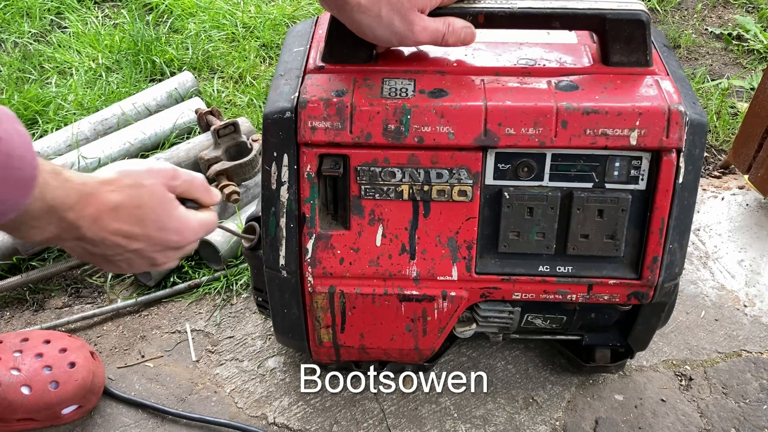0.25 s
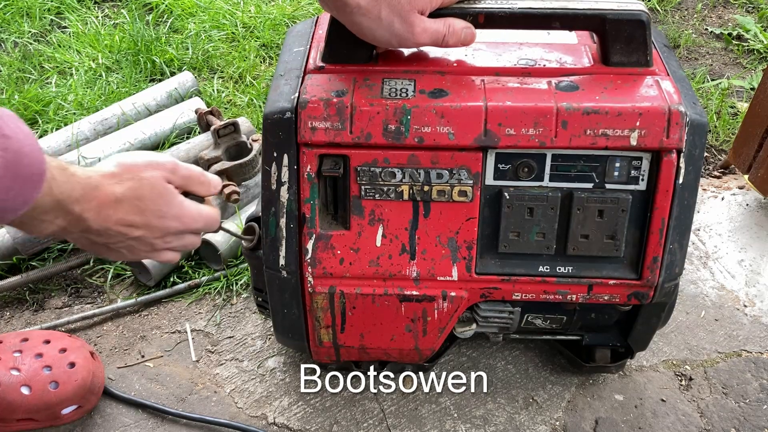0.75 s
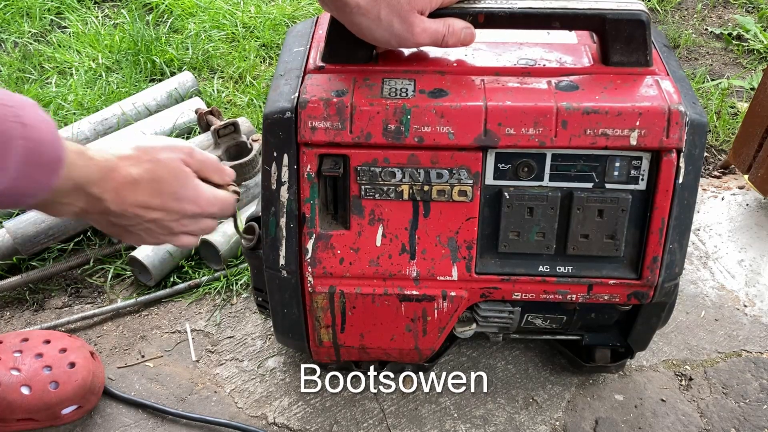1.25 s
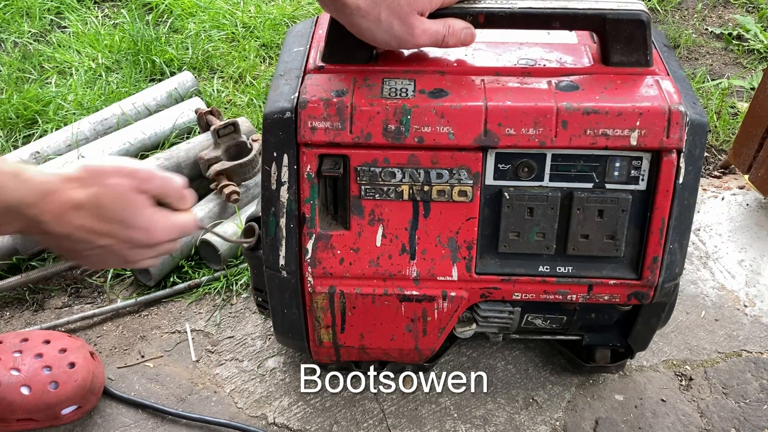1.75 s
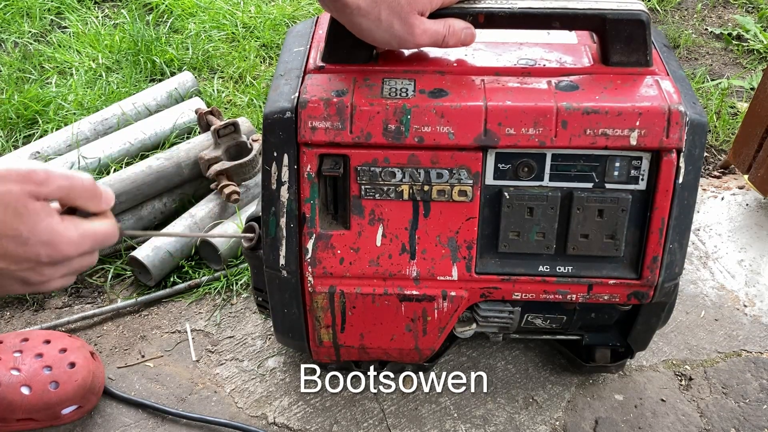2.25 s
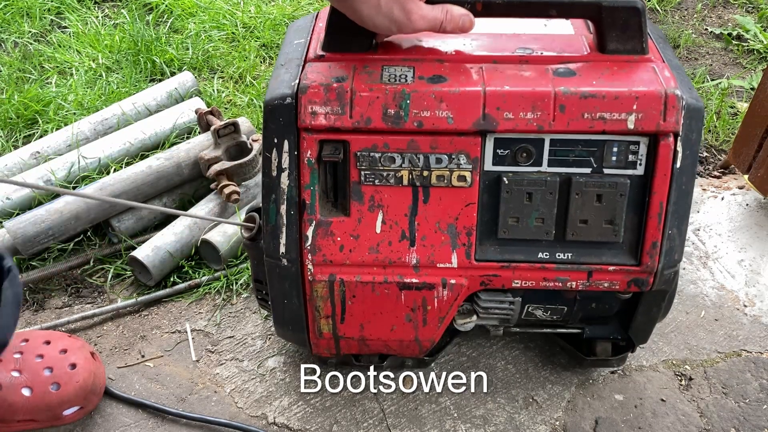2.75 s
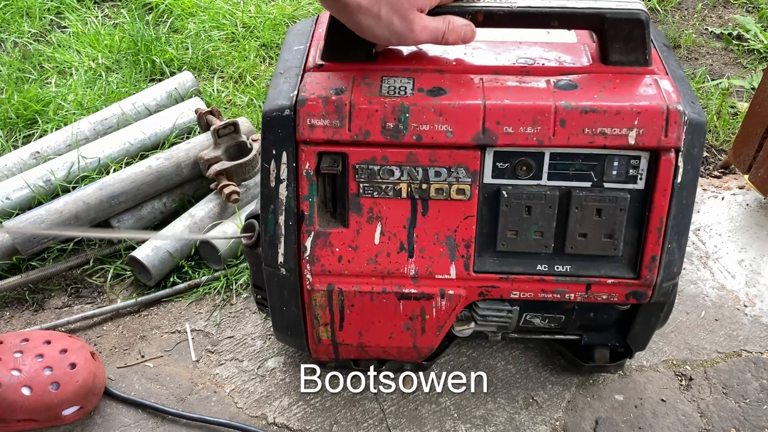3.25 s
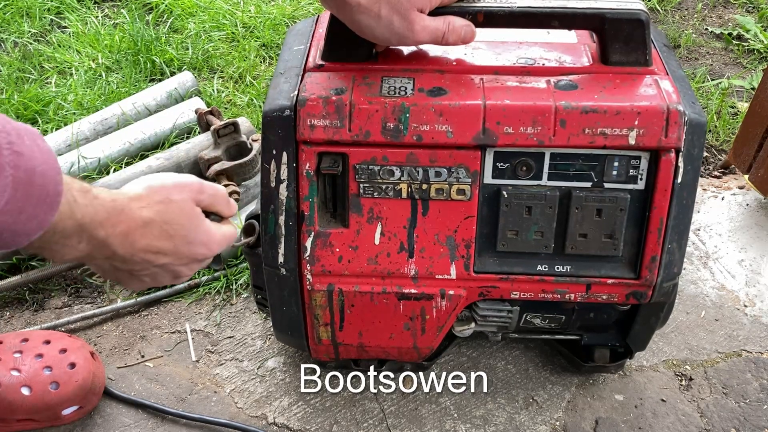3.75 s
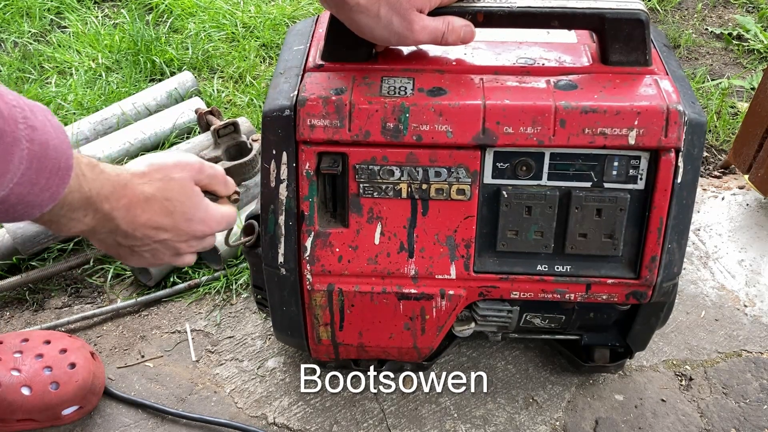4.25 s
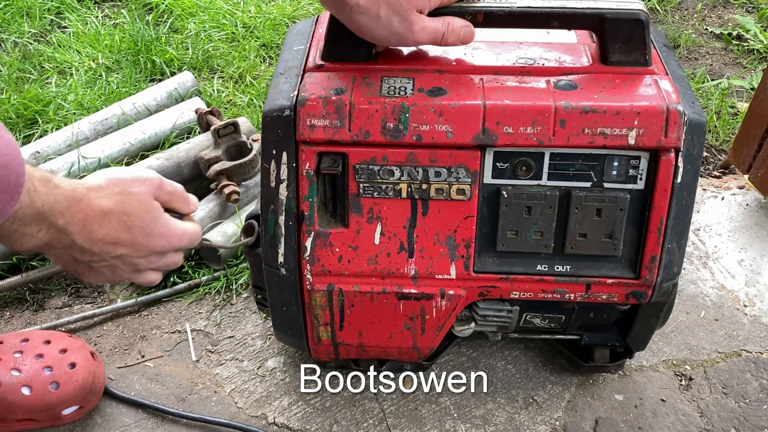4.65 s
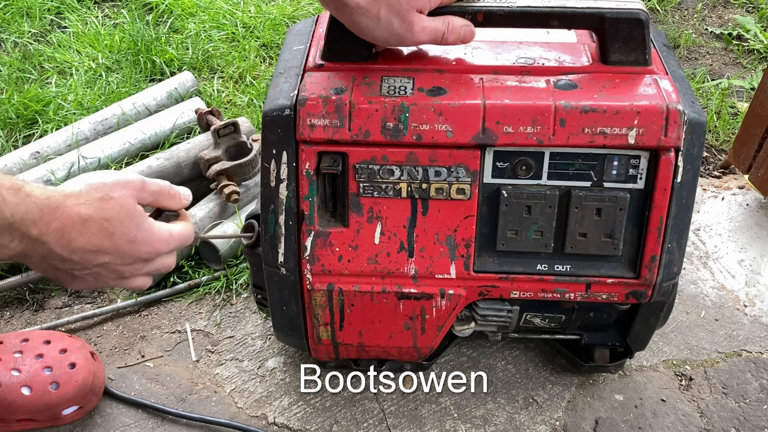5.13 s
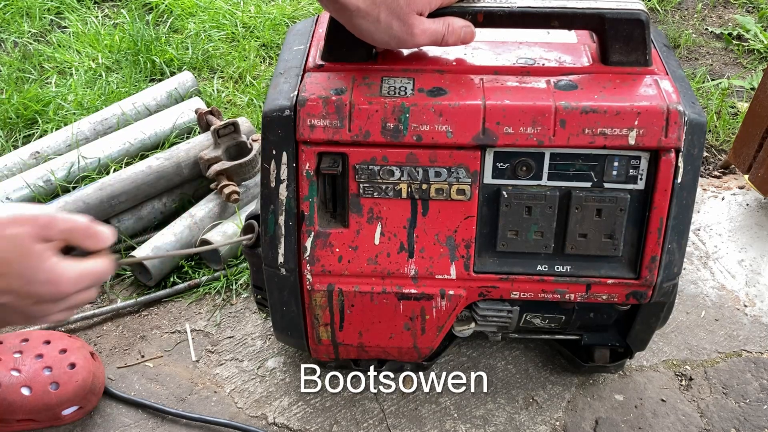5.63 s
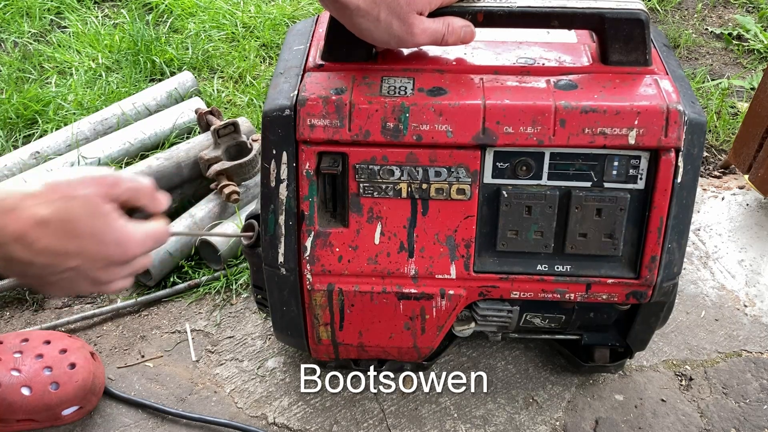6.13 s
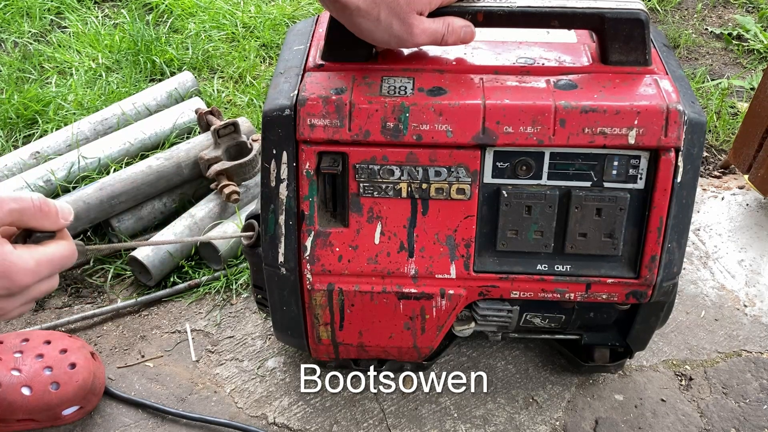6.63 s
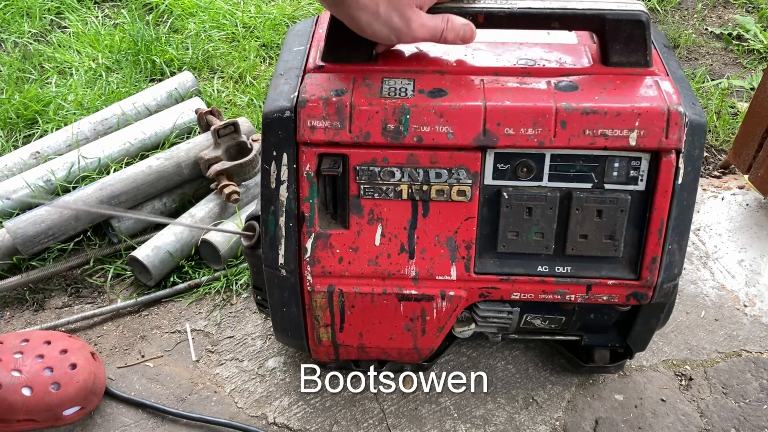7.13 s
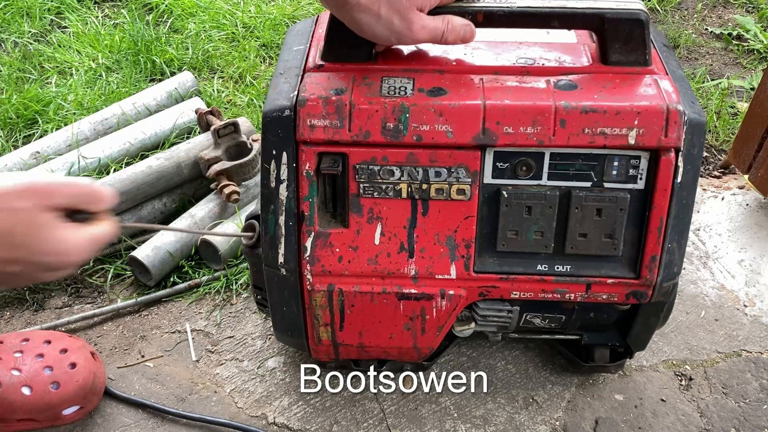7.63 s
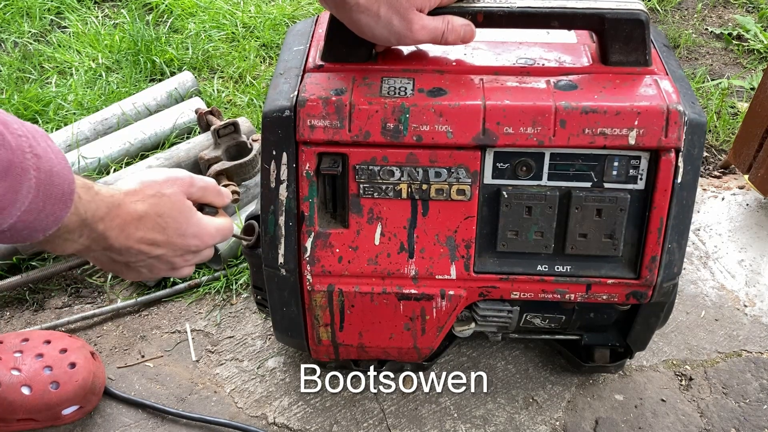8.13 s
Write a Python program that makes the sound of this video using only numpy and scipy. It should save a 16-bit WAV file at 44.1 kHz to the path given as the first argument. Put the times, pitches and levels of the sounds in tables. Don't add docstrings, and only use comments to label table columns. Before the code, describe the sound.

Two hard cord pulls spin a cold engine that ticks, whirrs and coasts down, the second bringing two weak exhaust coughs outdoors.

```python
import sys
import numpy as np
from scipy import signal
from scipy.fft import rfft, irfft, next_fast_len
from scipy.io import wavfile
from scipy.ndimage import uniform_filter1d, map_coordinates

SR = 44100
rng = np.random.default_rng(int(sys.argv[2]) if len(sys.argv) > 2 else 0)


def digitize_waveform(pressure):
    field = np.atleast_2d(pressure).T
    bounded = np.clip(field, -1, 1)
    quanta = np.round(bounded * 32767).astype(np.int16)
    wavfile.write(sys.argv[1], SR, quanta)


def magnitude_from_level(level_db):
    exponent = np.asarray(level_db, float) / 20
    return 10 ** exponent


N = 369558

# t/s, level/dB
CRANK = [(0.0, -41.5), (0.8, -50), (1.7, -56.5), (1.96, -63), (2.56, -59.5), (2.66, -34.5), (2.85, -29.5),
         (2.9, -39), (3.2, -39), (3.65, -44), (4.73, -54.5), (5.2, -62.5), (6.77, -67.5), (6.89, -37),
         (7.11, -29.5), (7.19, -43), (7.42, -39.5), (8.38, -51)]
# f/Hz, width/Hz, level/dB
CASE = [(264.5, 20, -2), (638, 13, 4.5), (865, 14, -1), (976, 97, -5), (1186, 27, -1.5), (1444, 39, -4.5),
        (1749, 97, -5), (2060, 49, -11)]
# f/Hz, density/(dB per Hz)
SIZZLE = [(3240, -35), (5500, -3.5), (6200, -13), (6650, -6.5), (7640, -9), (9160, -9.5), (10700, -5.5),
          (11300, -8.5), (13200, -14.5), (13600, -20.5), (15500, -9.5), (16300, -35.5), (16700, -49)]
# t/s, crack peak/dB
VALVES = [(0.117, -24), (0.321, -25), (0.5606, -25.5), (0.858, -27), (1.284, -36), (2.959, -21),
          (3.1932, -22), (3.342, -22.5), (3.5114, -24.5), (3.698, -24), (3.915, -25), (4.1779, -26.5),
          (4.5143, -28.5), (7.219, -14.5), (7.3758, -23.5), (7.531, -22), (7.6977, -18.5), (7.8916, -24.5),
          (8.1111, -22.5)]
# t/s, crack peak/dB
SECONDS = [(0.162, -31.5), (0.3732, -28.5), (0.624, -29.5), (0.943, -31.5), (1.3758, -39.5), (3.057, -20),
           (3.973, -34.5), (4.248, -29), (4.583, -38.5), (4.615, -29), (7.335, -26), (7.7438, -42),
           (7.9409, -29), (8.1713, -27)]
# t/s, crack peak/dB, knock over it/dB, sizzle over it/dB
BITES = [(1.4376, -30, -5.5, -4), (1.7417, -32.5, 9.5, -11), (2.0698, -27.5, -15, -0.5),
         (2.0895, -19, 3, -17), (2.111, -27, 12, 9), (5.2865, -29.5, -13, -4), (5.3, -21.5, -2.5, -3),
         (5.577, -30, -15, -11), (5.6765, -26.5, -1, -15.5), (6.1734, -30.5, -7.5, -4),
         (6.1907, -22.5, -5.5, 1), (6.362, -29, -25, -11.5), (6.4175, -27, 1.5, -2.5)]


def unit(x):
    return x / np.sqrt(np.mean(x ** 2) + 1e-20)


def along(points, hz):
    f, v = np.transpose(points)
    return np.interp(np.log(hz + 1), np.log(f + 1), v)


def curves(rows):
    s, *cols = np.transpose(rows)
    return [np.interp(np.arange(N) / SR, s, c) for c in cols]


def wobble(rate):
    knots = rng.standard_normal(int(N * rate / SR) + 4)
    return map_coordinates(knots, [np.arange(N) * rate / SR])


def gritty(depth_db):
    return magnitude_from_level(depth_db * wobble(150)) * rng.standard_normal(N)


def filtered(x, response):
    m = next_fast_len(N + SR // 2)
    gain = response(np.fft.rfftfreq(m, 1 / SR))
    gain = gain / np.sqrt(np.mean(np.abs(gain) ** 2))
    return irfft(rfft(x, m) * gain, m)[..., :N]


def colour(spectrum):
    return lambda hz: magnitude_from_level(along(spectrum, hz))


def resonances(modes, widen=1):
    def response(f):
        return sum(magnitude_from_level(db) * 1j * f * w * widen / (c * c - f * f + 1j * f * w * widen)
                   for c, w, db in modes)
    return response


def swells(times, dbs, rise, fall, slow=1):
    t = np.arange(0, N + 64, 64) / SR
    late = (t - np.asarray(times)[:, None]) / np.reshape(slow, (-1, 1))
    drop_db = np.where(late > 0, fall * late, -rise * late)
    gain = magnitude_from_level(np.asarray(dbs)[:, None] - drop_db).sum(axis=0)
    return np.interp(np.arange(N) / SR, t, gain)


def bursts(times, dbs, rise, t60):
    t = np.arange(SR // 4) / SR
    train = np.bincount(np.round(times * SR).astype(int), magnitude_from_level(dbs), N)[:N]
    envelope = (1 - np.exp(-(t / rise) ** 2)) * magnitude_from_level(-60 * t / t60)
    return signal.fftconvolve(train, envelope)[:N] * rng.standard_normal(N)


def rings(events, modes, scatter_db, flutter_db, length=.4):
    out, t = np.zeros(N + 2 * SR), np.arange(round(length * SR)) / SR

    def flutter():
        return flutter_db * np.interp(t, np.linspace(0, 2, 110), rng.standard_normal(110))

    for s, db in events:
        ring = 0
        for hz, level, t60 in modes:
            level_db = level + scatter_db * rng.normal() + flutter() - 60 * t / t60
            turns = hz * t + 0.025 * flutter() + rng.random()
            ring = ring + magnitude_from_level(level_db) * np.sin(2 * np.pi * turns)
        out[round(s * SR):][:len(t)] += magnitude_from_level(db) * ring * (1 - np.exp(-t / .004))
    return out[:N]


def echoes(x, decay):
    hz, t, z = signal.stft(rng.standard_normal((2, SR)), SR, nperseg=256)
    tail = signal.istft(z * magnitude_from_level(-60 * t / along(decay, hz)[:, None]), SR, nperseg=256)[1]
    return signal.fftconvolve(x[None], tail / np.linalg.norm(tail[0]), axes=1)[:, :N]


def far_engine():
    # t/s, f/Hz, level/dB
    drone = [(0, 59.9, -55), (.6, 58.04, -41), (1.2, 66, -50.5), (2.5, 59.86, -51), (3.9, 55, -50),
             (4.5, 63, -43), (4.8, 66, -45.5), (5.1, 62, -58), (8.38, 58.3, -60)]
    hz, db = curves(drone)
    turn = 2 * np.pi * np.cumsum(hz * (1 + 0.011 * wobble(6))) / SR
    return magnitude_from_level(db + 2 + 2.5 * wobble(7)) * (np.sin(turn) + magnitude_from_level(-8.5) * np.sin(2 * turn))


def town():
    # t/s, level/dB
    traffic = [(0.0, -41.5), (1.75, -43.5), (1.98, -44.5), (4.43, -44), (4.57, -44), (5.09, -47),
               (6.3, -50), (8.38, -45.5)]
    # f/Hz, density/(dB per Hz)
    rumble_bands = [(20, -51.5), (34, -4.5), (59, 2.5), (81, -4.5), (113, -9), (135, -12.5), (166, -31),
                    (200, -25.5), (260, -31), (440, -120)]
    # f/Hz, density/(dB per Hz)
    air_bands = [(76, -15.5), (130, -3), (167, -9.5), (390, -13.5), (656, -21), (964, -21.5), (1240, -42),
                 (1360, -26), (2680, -43.5), (2950, -33), (13000, -83.5)]

    def pair(spread):
        return np.array([[1, spread], [1, -spread]]) @ rng.standard_normal((2, N))

    rumble_db = curves(traffic)[0] + 4.0 + 1.27 * wobble(12.0) + [[-.7], [.7]]
    rumble = unit(filtered(pair(.12), colour(rumble_bands))) * magnitude_from_level(rumble_db)
    air = unit(filtered(pair(0.37), colour(air_bands))) * magnitude_from_level(-53 + 0.58 * wobble(2.8))
    return rumble + far_engine() + air


def rattle(count):
    when, pitch, size, slide = rng.random((count, 4)).T[..., None]
    t = np.arange(900) / SR
    panel = 1 + (pitch * (len(CASE) - 1)).astype(int)
    hz = np.transpose(CASE)[0][panel] * (1 + .1 * (slide - .5))
    envelope = magnitude_from_level(8.5 * size ** 2 - 60 * t * hz / 40) * (1 - np.exp(-t / 0.0015))
    ping = envelope * np.sin(2 * np.pi * hz * t * (1 + 8 * (slide - .5) * t))
    at = (when * N + t * SR).astype(int)
    return unit(np.bincount(at.ravel(), ping.ravel())[:N])


def whirr():
    # f/Hz, density/(dB per Hz)
    broad_bands = [(88, -38.5), (150, -4.5), (427, -9), (630, -1.5), (746, -16.5), (1030, 2.5), (1300, -10),
                   (1830, -8.5), (8500, -35), (11000, -59), (18700, -120)]
    panels = unit(filtered(gritty(5.5), resonances(CASE)))
    broad = unit(filtered(gritty(1.0), colour(broad_bands)))
    valve_s = np.transpose(VALVES)[0]
    bite_s, bite_db = np.transpose(BITES)[:2]
    chuff_db, chuff_s = -4, 0.1
    chuff = 1 + swells(valve_s + 0.016, 0 * valve_s + chuff_db, 570, 20 / chuff_s)
    shake = swells(bite_s + 0.0031, bite_db - 26, rise=600, fall=155)
    turning = magnitude_from_level(curves(CRANK)[0]) * chuff + shake
    noise = magnitude_from_level(-3.5) * panels + magnitude_from_level(-5) * broad + magnitude_from_level(-5.0) * rattle(count=900)
    return turning * magnitude_from_level(2.42 * wobble(25)) * noise


def piston_air():
    # f/Hz, width/Hz, level/dB
    gaps = [(7850, 74, -1), (8750, 78, -3), (9800, 140, -2), (10920, 100, -1.5), (12260, 180, -23),
            (12750, 130, -16), (15000, 42, -26), (15700, 36, -10)]
    # peak t/s, level/dB, slowness
    strokes = [(0.0, -54, 0.62), (0.23, -58, 0.41), (0.44, -59, 0.5), (0.57, -64, 0.51), (0.7, -57, 0.54),
               (0.86, -59, 0.63), (1.05, -55, 0.65), (1.28, -59.5, 1), (1.63, -54, 1.8), (3.2, -57, 6.5),
               (3.81, -59, 0.84), (4.041, -61, 0.52), (4.18, -58, 0.39), (4.329, -59.5, 0.8),
               (4.51, -55, 1), (4.739, -56.5, 1), (5.06, -55, 1.46), (7.45, -53, 5.8), (7.97, -64, 1.3),
               (8.25, -62, 0.94), (8.38, -57, 0.41)]
    # peak t/s, level/dB
    jets = [
        (2.101, -54),
        (2.89, -32.5),
        (5.31, -47.5),
        (5.611, -65),
        (6.19, -54),
        (6.439, -69),
        (7.13, -28),
    ]

    def gap_response(hz):
        return resonances(gaps, widen=2.2)(hz) * np.clip(hz / 7600, 0, 1) ** 8

    hiss = unit(filtered(gritty(3.3), gap_response))
    leak = magnitude_from_level(-62 + 2.1 * (curves(CRANK)[0] + 39.0))
    s, db, slow = np.transpose(strokes)
    puffs = swells(s, db, rise=246, fall=291, slow=slow)
    blasts = swells(*np.transpose(jets), rise=793, fall=224)
    return (leak + puffs + blasts) * magnitude_from_level(2.5) * hiss


def cord_rasp():
    # peak t/s, level/dB, slowness
    cord = [
        (2.619, -56, 1.2),
        (2.75, -38, 1.3),
        (6.44, -61.5, 2.2),
        (6.6, -61, 2),
        (6.74, -59, 1.3),
        (6.88, -55, 1.3),
        (6.99, -40, 0.98),
        (2.09, -52, 0.53),
    ]
    s, db, slow = np.transpose(cord)
    gain = swells(s, db, rise=255, fall=278.5, slow=slow)
    return gain * unit(filtered(gritty(2.5), colour(SIZZLE)))


def contacts():
    # t/s, knock/dB
    bumps = [(0.695, -39.5), (1.036, -40), (1.35, -41.5), (2.022, -38.5), (2.077, -26), (1.704, -35),
             (2.013, -36.5), (2.0436, -38), (4.323, -38.5), (4.4646, -44.5), (6.0955, -32), (6.246, -35.5),
             (6.2977, -34), (7.9924, -37), (8.2346, -36.5), (8.3442, -39)]
    # t/s, knock/dB
    ratchet = [(2.617, -40), (2.7, -32), (2.716, -27), (2.737, -26.5), (2.785, -26), (2.842, -31),
               (2.858, -28), (6.915, -34), (6.94, -29), (6.986, -21), (6.997, -21), (7.014, -23),
               (7.04, -27), (7.079, -27), (7.102, -27), (5.371, -38), (5.412, -43), (5.449, -44)]
    # t/s, crack peak/dB, knock over it/dB, sizzle over it/dB
    pulls = [(2.642, -36, 2.5, -5), (2.671, -22.5, 6, -25), (2.7217, -23.5, -9, -8.5),
             (2.753, -18.5, -1, -9), (2.816, -10, -5, -8), (2.8683, -8.5, -10, -0.5),
             (2.8943, -36, -12, 17.5), (6.871, -36.5, 3, -12), (6.8912, -27.5, 1, -7),
             (6.962, -25, -5, 0.5), (6.985, -20, -5.5, -13), (7.052, -11, -6, -6), (7.112, -12, -2, 4)]
    # crack, knock and sizzle in dB over the row's level
    kinds = ((VALVES, (0, -11.5, -13)), (SECONDS, (0, -27, -15)), (bumps + ratchet, (-23.5, 0, -46)))
    blows = [(s, *np.add(db, mix)) for rows, mix in kinds for s, db in rows]
    clacks = [(s, db, db + knock, db + sizzle) for s, db, knock, sizzle in BITES + pulls]
    return np.transpose(blows + clacks)


def tocks(times, dbs):
    mode_hz, spread, peak_s = 1045, .05, .0042
    out, t = np.zeros(N + SR), np.arange(SR // 20) / SR
    envelope = (t / peak_s * np.exp(1 - t / peak_s)) ** 2
    for s, db, chance in zip(times, dbs, rng.standard_normal((len(times), 1))):
        tone = np.sin(2 * np.pi * mode_hz * (1 + spread * chance) * t)
        out[round(s * SR):][:len(t)] += magnitude_from_level(db) * envelope * tone
    return out[:N]


def cover_knocks(s, knock_db):
    # f/Hz, width/Hz, level/dB
    cover = [(259.3, 11, -4.5), (642.4, 30, 3), (1004, 110, 4), (1110, 12, -29.5)]
    # f/Hz, level/dB, t60/s
    tappet = [(1780, 2.5, 0.067), (1420, 0, 0.11), (1030, -4, 0.044)]
    # t/s, level/dB
    thumps = [
        (2.641, -25),
        (2.652, -29),
        (5.304, -37),
        (5.69, -36),
        (6.097, -32),
        (6.298, -32),
        (6.871, -27.5),
        (7.112, -21),
    ]
    # f/Hz, level/dB, t60/s
    boom = [(642, 3.5, 0.059), (1090, -5.5, 0.073)]
    thuds = filtered(bursts(s - .0012, knock_db + 7, rise=0.0035, t60=0.028), resonances(cover))
    gear = rings(VALVES + SECONDS[:5], tappet, scatter_db=-0.5, flutter_db=0, length=.07)
    booms = rings(thumps, boom, scatter_db=-2, flutter_db=6.5, length=.1)
    return thuds + tocks(s, knock_db - 1) + magnitude_from_level(-12.5) * gear + booms


def starter_rings():
    # f/Hz, level/dB, t60/s
    cup = [(3176, -2.5, 1.15), (3095, -13, .7), (3767, -3.5, 1.5), (3829, -3, 1.6), (3822, -12, 1.2),
           (5650, -9, .2), (7375, -8, .22), (4764, -8, .08), (7655, -10, .28), (8012, -17, .24),
           (10965, -1, .16), (11020, -2, .2), (11130, -3, .18), (11465, -16, .25)]
    # t/s, level/dB
    release = [
        (2.872, -26.5),
        (7.112, -24),
    ]
    # f/Hz, level/dB, t60/s
    pawl = [(3150, -14, .3), (4800, 0, .3), (4900, -2, .25), (7400, 0, .1), (7100, -6, .1)]
    # t/s, level/dB
    catch = [
        (2.111, -34),
        (5.303, -38.5),
        (6.192, -47),
        (6.419, -34),
    ]
    cup_ring = rings(release, cup, scatter_db=.5, flutter_db=4.2, length=1.5)
    full = rings(catch[1:3], pawl, scatter_db=1.5, flutter_db=3)
    high = rings(catch[::3], pawl[3:], scatter_db=1, flutter_db=3)
    return cup_ring + full + high


def hits():
    # f/Hz, density/(dB per Hz)
    crack_bands = [(710, -13), (1200, -6.5), (2540, -8), (3050, -8), (3670, -6.5), (5450, -25), (6500, -30),
                   (8450, -26), (14300, -120)]
    s, db, knock_db, sizzle_db = contacts()

    def crack_response(hz):
        return colour(crack_bands)(hz) * (.8 + 1.5 * np.abs(resonances(CASE[4:7], widen=1.2)(hz)))

    crack = filtered(bursts(s - .002, db + 3, rise=.0055, t60=.04), crack_response)
    sizzle = filtered(bursts(s - .0015, sizzle_db + 3, rise=.0034, t60=.045), colour(SIZZLE))
    return crack + cover_knocks(s, knock_db) + sizzle + starter_rings()


def bird():
    # t/s, length/s, first f/Hz, last f/Hz, level/dB
    notes = [
        (4.906, .045, 8400, 8300, -74),
        (4.933, .07, 7850, 7850, -81),
        (4.948, 0.037, 8150, 8360, -63),
        (4.984, 0.078, 8500, 8700, -74),
        (4.99, .1, 7850, 7900, -85),
        (5.105, 0.09, 8300, 7970, -61),
        (5.348, 0.1, 4125, 3820, -40.5),
        (5.499, 0.1, 3487, 3300, -44),
        (5.598, 0.15, 2644, 2600, -54.5),
        (5.688, 0.092, 3290, 3090, -40),
             (5.95, 0.045, 8140, 8140, -60), (5.985, .03, 7900, 7940, -50),
                    (6, 0.04, 7430, 7540, -58), (6.023, 0.02, 8100, 8060, -56),
                    (6.037, 0.023, 7150, 7500, -52), (6.118, 0.16, 8130, 8460, -61),
                    (6.251, 0.13, 7800, 7570, -63), (6.268, 0.082, 9000, 8500, -65),
                    (6.35, 0.038, 8200, 7870, -58), (6.449, 0.062, 4670, 4150, -44.5),
                    (6.477, 0.053, 3970, 3730, -44.5), (6.503, 0.029, 4360, 4040, -51),
                    (6.544, 0.037, 3570, 2950, -45.5), (6.549, 0.037, 3840, 3280, -51),
                    (6.602, 0.018, 3240, 3330, -40), (6.645, 0.03, 4550, 4520, -42),
                    (6.672, .03, 4440, 4485, -40), (6.702, 0.028, 4570, 4640, -38.5),
                    (6.65, .12, 8530, 8400, -72), (6.678, 0.074, 13900, 14300, -75),
                    (6.635, .055, 13300, 13000, -75), (6.731, 0.036, 4700, 4900, -52),
                    (6.743, 0.045, 4300, 3560, -46), (6.834, 0.073, 4220, 4050, -48)]
    # multiple, level/dB
    overtones = [(2, -42), (3, -46)]
    # f/Hz, t60/s
    garden = [(2500, 0.39), (5000, 0.31), (8500, 0.37)]
    song, flutter_db, waver = np.zeros(N), 3.7 * wobble(55), 1 + .016 * wobble(170)
    for s, length, first_hz, last_hz, db in notes:
        u = np.linspace(0, 1, round(length * SR))
        at = slice(round(s * SR), round(s * SR) + len(u))
        hz = (last_hz + (first_hz - last_hz) * (1 - u) ** 2.18) * waver[at]
        turn = 2 * np.pi * np.cumsum(hz) / SR
        whistle = sum(magnitude_from_level(g) * np.sin(k * turn) * (k * last_hz < 16000) for k, g in [(1, 0)] + overtones)
        song[at] += np.sin(np.pi * u ** 0.64) ** .9 * magnitude_from_level(db + flutter_db[at]) * whistle
    direct = song * magnitude_from_level([[.7], [-.7]])
    return direct + magnitude_from_level(5.5) * echoes(song, garden)


def exhaust():
    # t/s, level/dB, time until the pitch drops/s, chamber ring/dB, ring f/Hz
    coughs = [
        (7.6933, -8.5, 0.0075, -18.5, 419.7),
        (8.1086, -12, 0.0072, -11, 467),
    ]
    # delay/s, level/dB
    slaps = [
        (.029, -16),
        (.046, -21.5),
        (.066, -25),
        (.08, -24.5),
    ]
    # f/Hz, width/Hz, level/dB
    muffler = [(188, 160, 9), (370, 120, -0.5), (637, 160, -2.5)]
    out, t = np.zeros(N), np.arange(SR // 10) / SR
    for s, db, drop, ring_db, ring_hz in coughs:
        hz = 86 + 340 / (1 + np.exp((t - drop) / 0.0023))
        swell = np.clip(t / (drop + 0.0032), 0, 1) ** 1.47 * np.exp(-(t / 0.023) ** 3)
        crest = hz[:round((drop + .005) * SR)].sum()
        thud = swell * np.cos(2 * np.pi * (np.cumsum(hz) - crest) / SR)
        ring = np.exp(-((t - .006) / 0.0031) ** 2) * np.sin(2 * np.pi * ring_hz * (t - .0017))
        tail = magnitude_from_level(-6.5 - 60 * t / 0.052) * (1 - np.exp(-t / 0.0024)) * np.sin(2 * np.pi * 730 * t)
        out[round(s * SR):][:len(t)] += magnitude_from_level(db) * thud + magnitude_from_level(ring_db) * (ring + tail)
    out = out + sum(magnitude_from_level(db) * np.roll(out, round(s * SR)) for s, db in slaps)

    def chambers(hz):
        return resonances(muffler)(hz) / (1 + 1j * hz / 900) ** 2

    s, db = np.transpose(coughs)[:2]
    return out + filtered(bursts(s + .008, db - 20, rise=.01, t60=.4), chambers)


def ports(x):
    # f/Hz, phase/rad
    lead_points = [(300, 0.5), (1030, 0.91), (2500, 1.32), (3190, 1.27), (3800, 4), (4300, 5), (5340, 4),
                   (6290, 0.26), (8270, -1.5), (11000, -5.5), (12200, -7.5), (14400, -9), (15000, -8.5)]
    # f/Hz, level/dB
    tilt = [(100, 1.5), (350, 0), (700, 0), (1400, -1.2), (2800, -.6), (5000, 1.5), (8000, 0.5)]

    def port(hz, way):
        lead = along(lead_points, hz) * (hz > 300)
        return magnitude_from_level(way * along(tilt, hz) / 2) * np.exp(.5j * way * lead)

    return filtered(x, lambda hz: np.array([port(hz, 1), port(hz, -1)]))


def thinned(x):
    # f/Hz, level/dB
    deaf = [(4000, -130), (5500, -119), (8300, -119), (8800, -85), (9400, -85), (9800, -120), (12300, -117),
            (13000, -87), (13700, -78), (14300, -100), (15500, -100), (16500, -75)]
    # f/Hz, depth/dB
    mask = [(4000, 45), (5500, 20), (8300, 25), (8650, -4), (9500, -4), (9750, 25), (12500, 21), (13200, 4),
            (13800, 4), (14300, 22), (16500, 6)]
    hz, _, z = signal.stft(x, SR, nperseg=1024)
    power = np.mean(np.abs(z) ** 2, axis=0) + 1e-20
    band_db = 10 * np.log10(np.abs(uniform_filter1d(power, size=9, axis=0)) + 1e-20)
    treble_db = 10 * np.log10(np.mean(power[(hz > 4000) & (hz < 12000)], axis=0))
    attack = np.diff(treble_db, prepend=0) > 8
    unmasked = attack | (band_db > treble_db - along(mask, hz)[:, None])
    keep = (band_db > along(deaf, hz)[:, None]) & unmasked
    keep = keep | (hz < 4500)[:, None]
    in_range = ((hz > 24) & (hz < 16700))[:, None]
    return signal.istft(z * keep * in_range, SR, nperseg=1024)[1][:, :N]


def scene():
    # f/Hz, t60/s
    yard = [(150, 0.31), (1000, 0.14), (4000, 0.24), (12000, 0.13)]
    background = town()
    machine = whirr() + piston_air() + cord_rasp() + hits() + exhaust()
    reflected = filtered(machine, lambda hz: np.clip(hz / 400, 0, 1) ** 2)
    return ports(machine) + magnitude_from_level(-7.5) * echoes(reflected, yard) + bird() + background


def band_limit(x):
    return signal.sosfilt(signal.butter(12, 16810, fs=SR, output="sos"), x)


def record(dry):
    rounded = dry / (1 + np.abs(dry / .85) ** 4) ** (1 / 4)
    return band_limit(thinned(rounded))


dry = scene()
out = record(dry)
digitize_waveform(out)
```